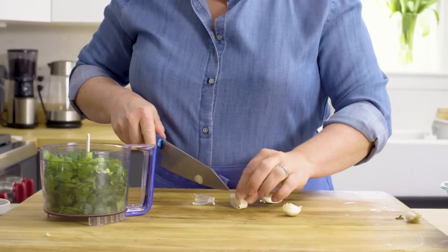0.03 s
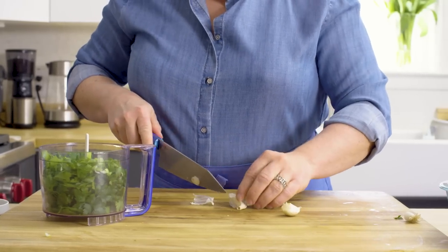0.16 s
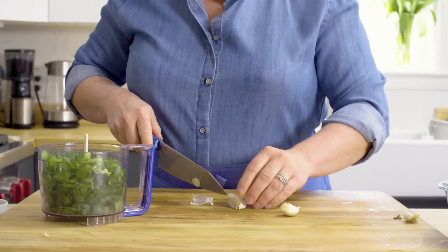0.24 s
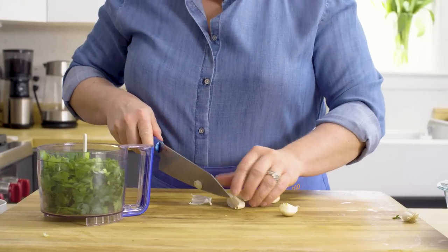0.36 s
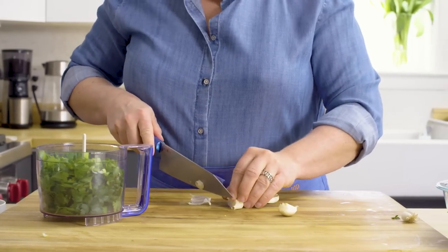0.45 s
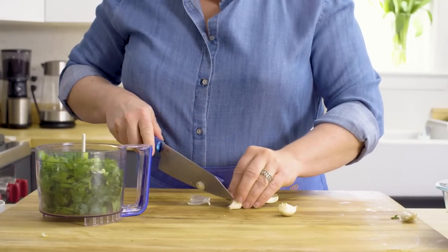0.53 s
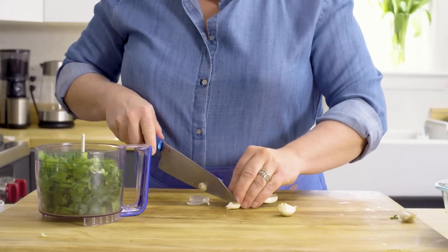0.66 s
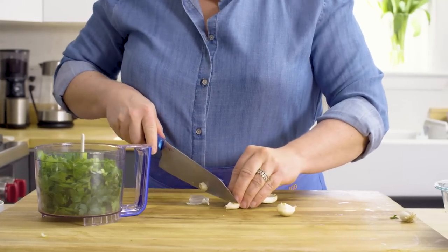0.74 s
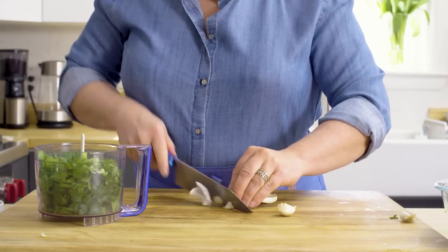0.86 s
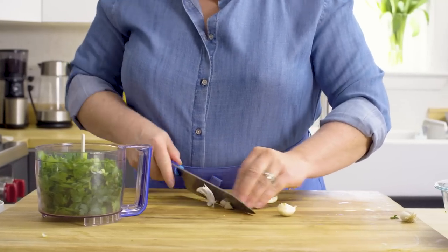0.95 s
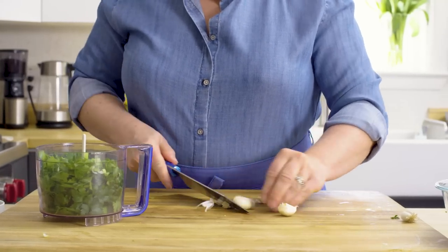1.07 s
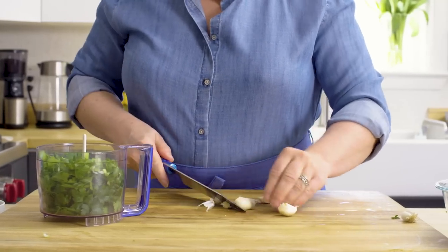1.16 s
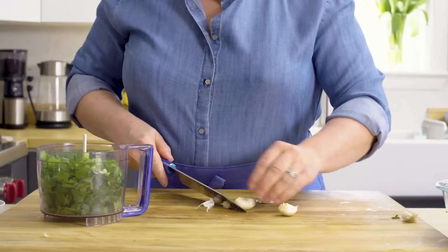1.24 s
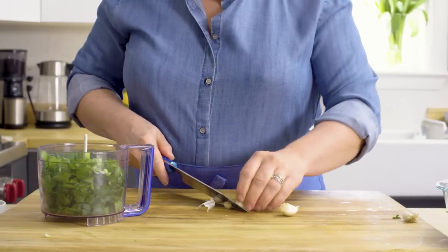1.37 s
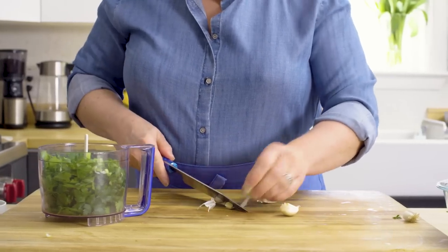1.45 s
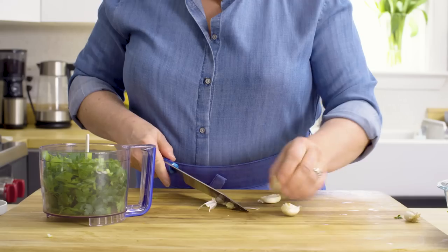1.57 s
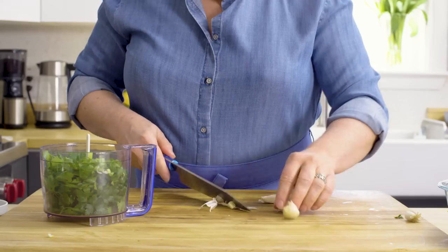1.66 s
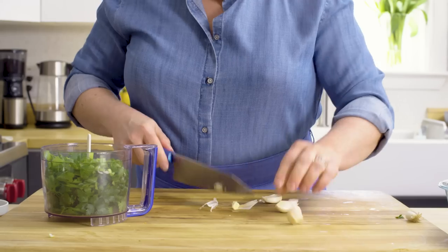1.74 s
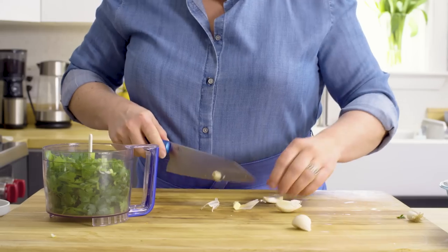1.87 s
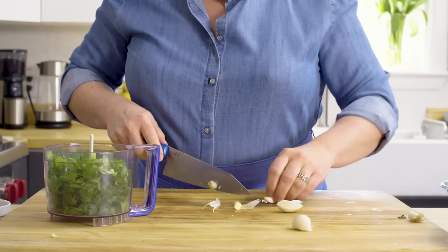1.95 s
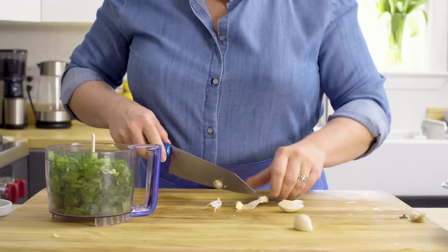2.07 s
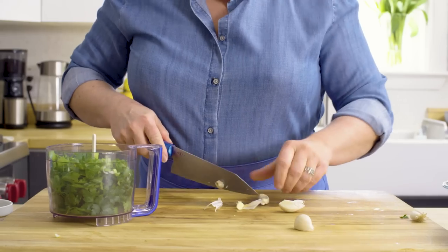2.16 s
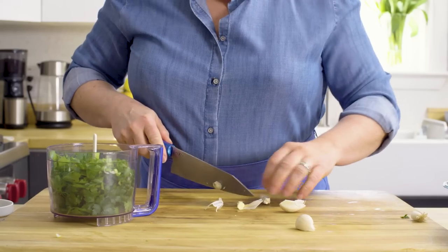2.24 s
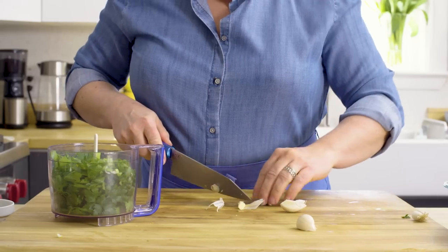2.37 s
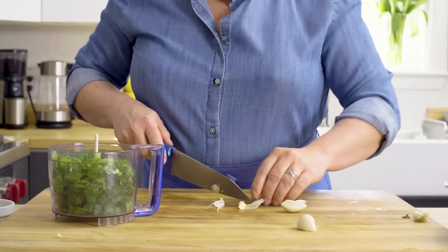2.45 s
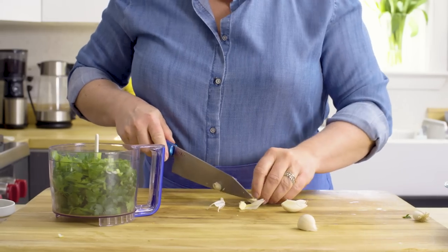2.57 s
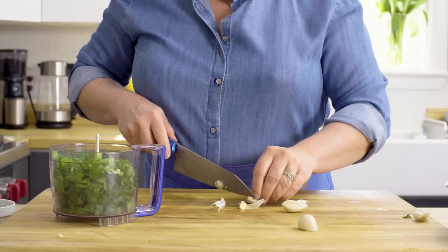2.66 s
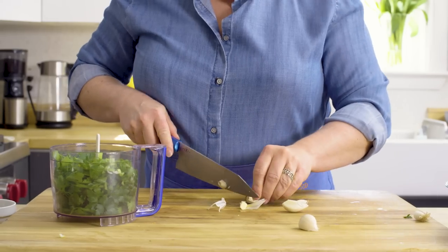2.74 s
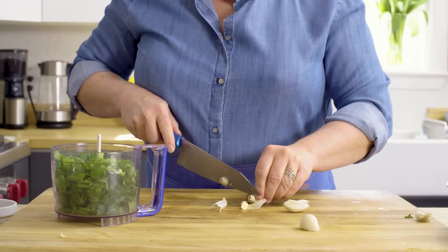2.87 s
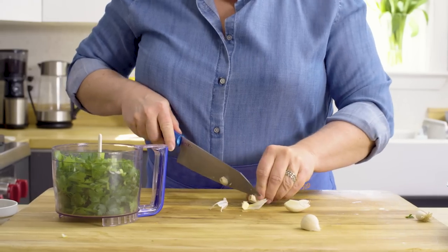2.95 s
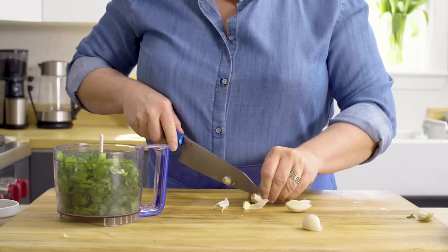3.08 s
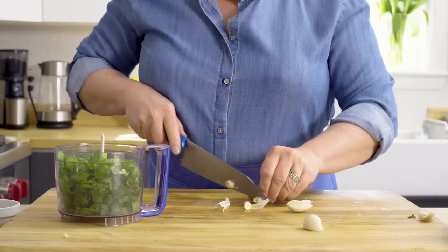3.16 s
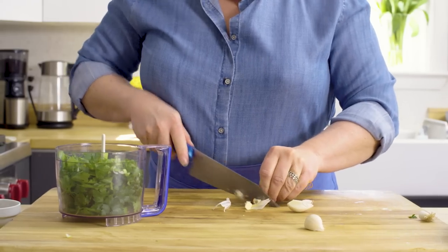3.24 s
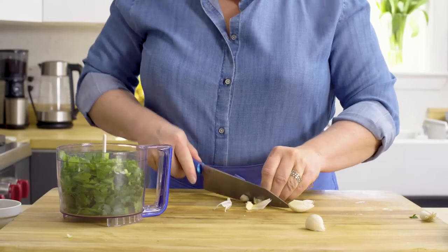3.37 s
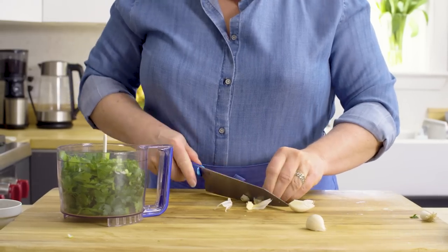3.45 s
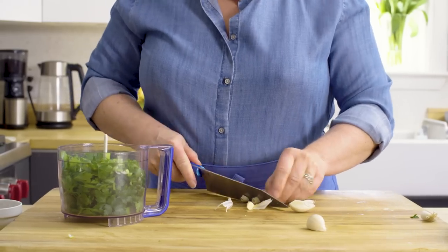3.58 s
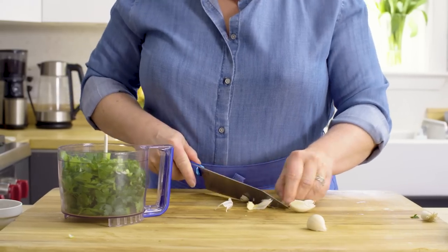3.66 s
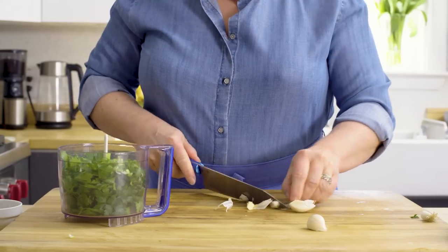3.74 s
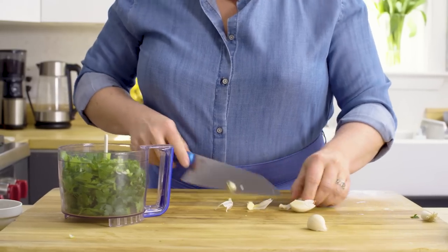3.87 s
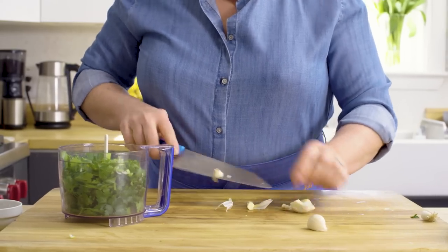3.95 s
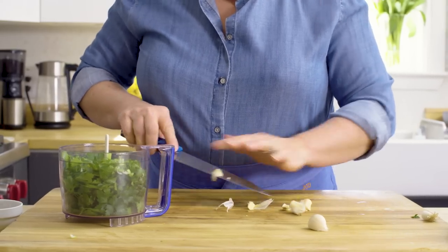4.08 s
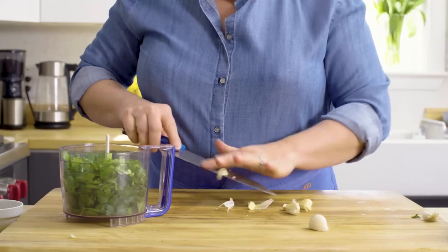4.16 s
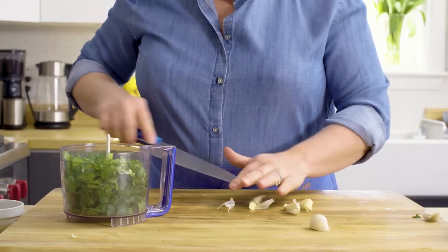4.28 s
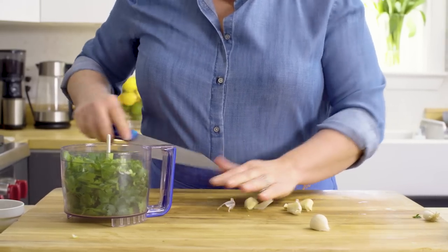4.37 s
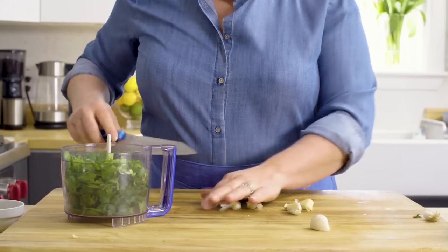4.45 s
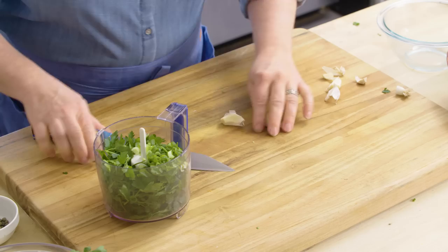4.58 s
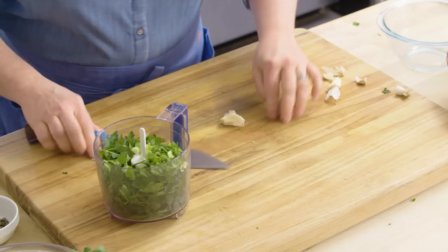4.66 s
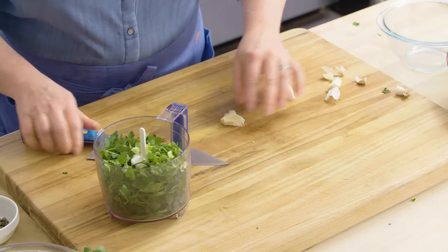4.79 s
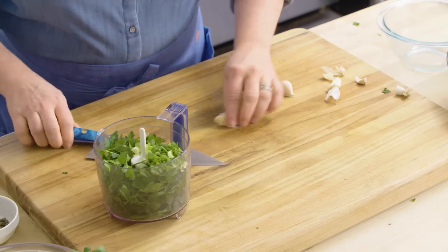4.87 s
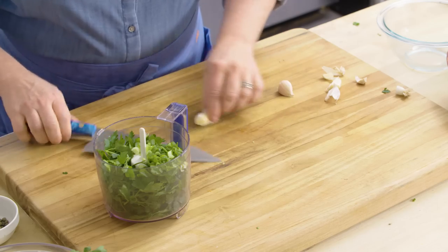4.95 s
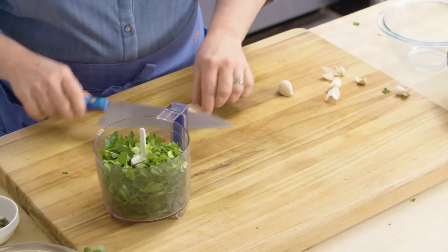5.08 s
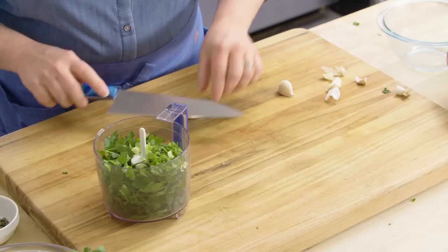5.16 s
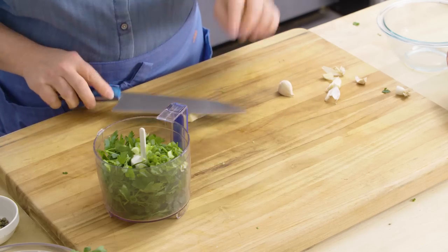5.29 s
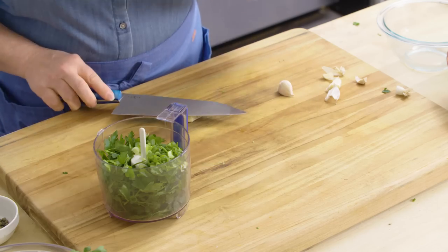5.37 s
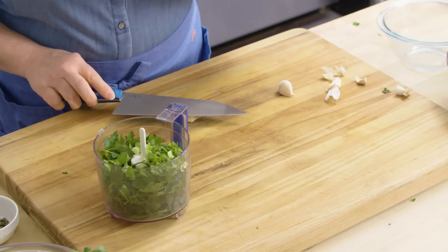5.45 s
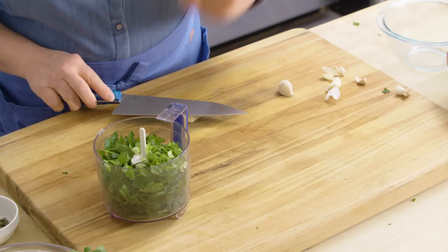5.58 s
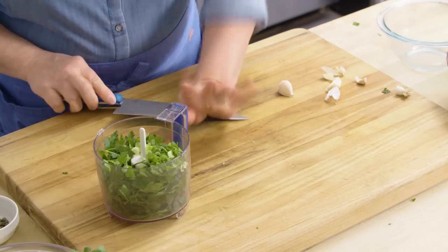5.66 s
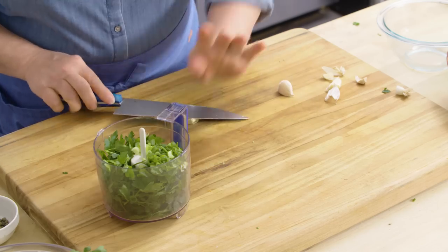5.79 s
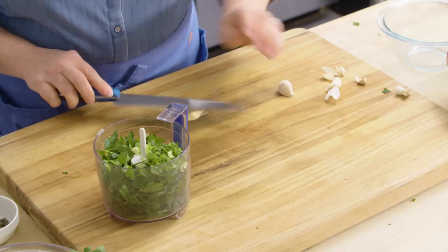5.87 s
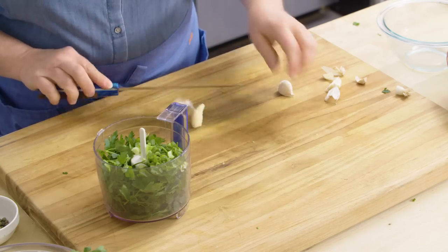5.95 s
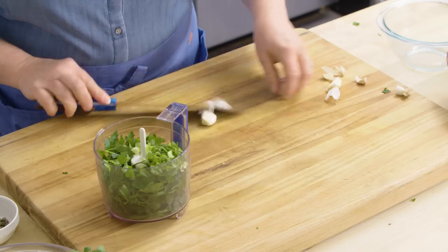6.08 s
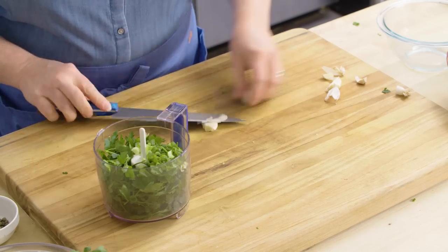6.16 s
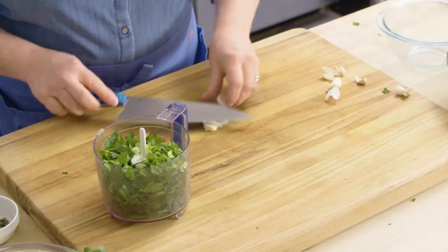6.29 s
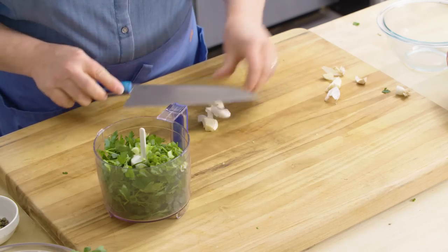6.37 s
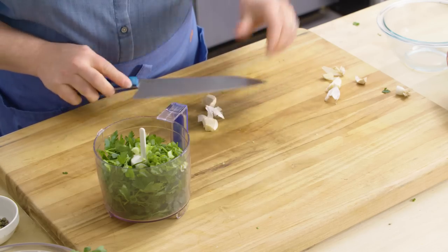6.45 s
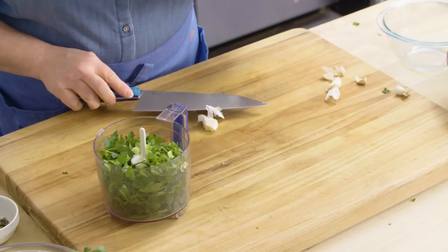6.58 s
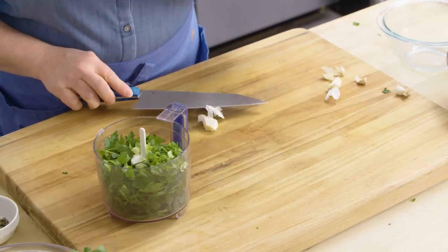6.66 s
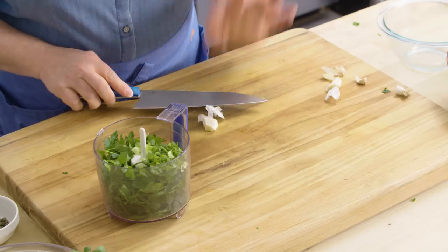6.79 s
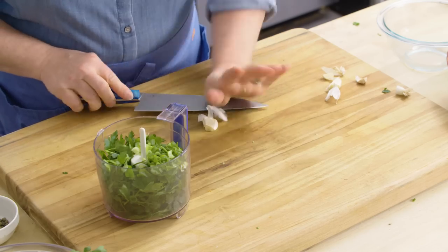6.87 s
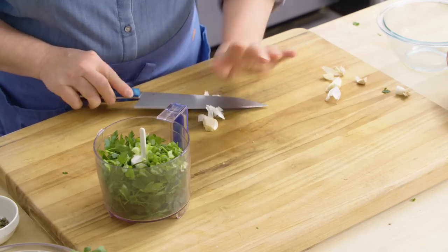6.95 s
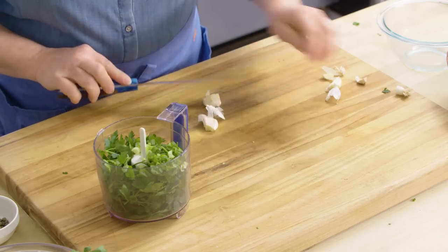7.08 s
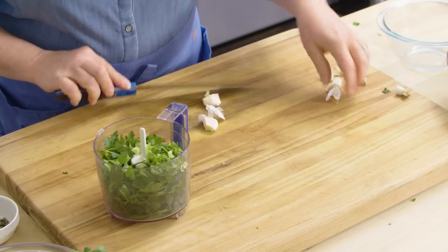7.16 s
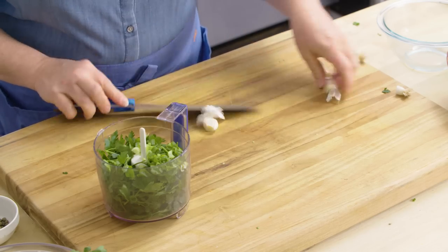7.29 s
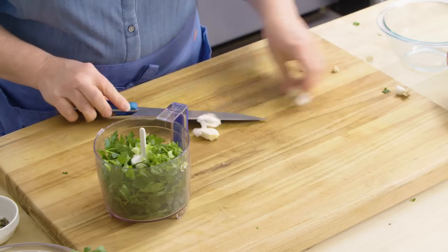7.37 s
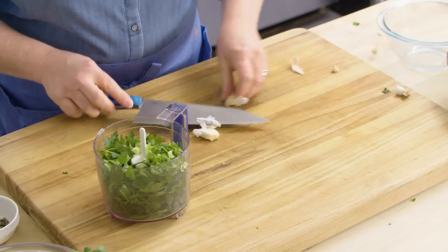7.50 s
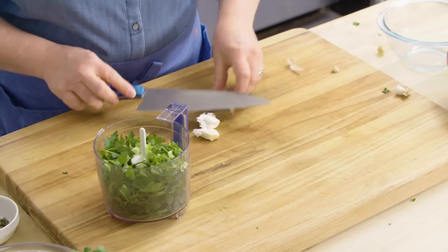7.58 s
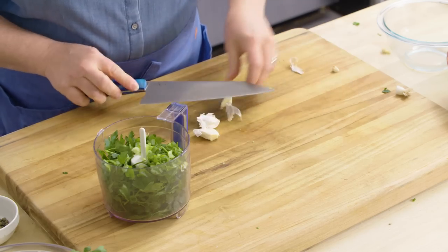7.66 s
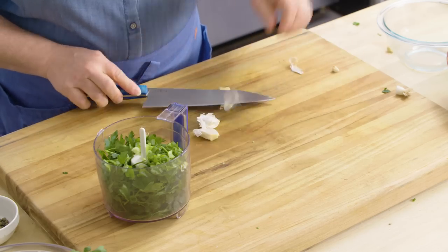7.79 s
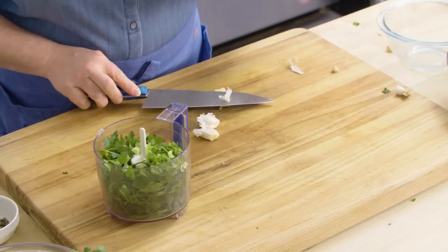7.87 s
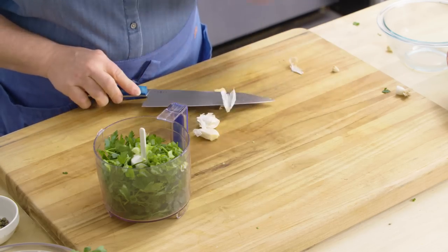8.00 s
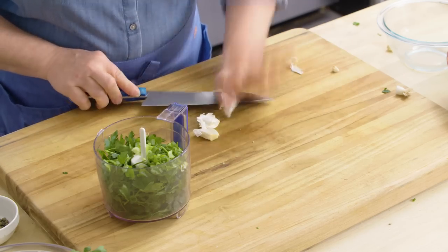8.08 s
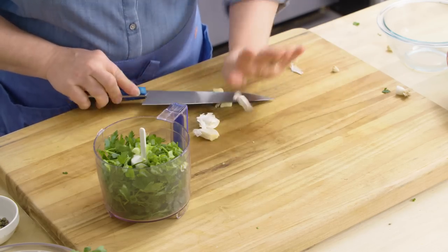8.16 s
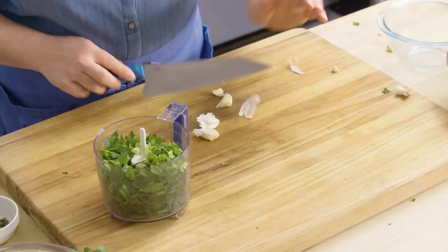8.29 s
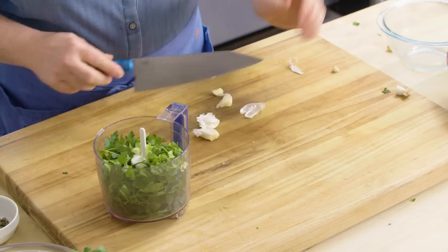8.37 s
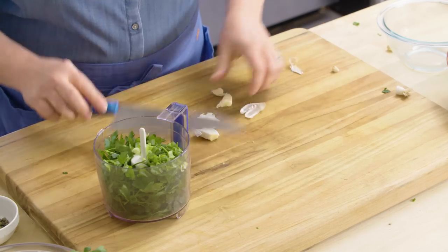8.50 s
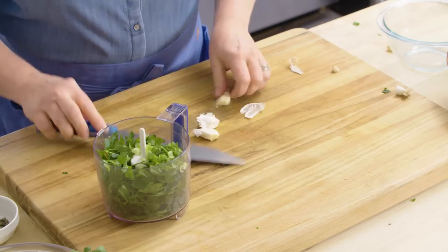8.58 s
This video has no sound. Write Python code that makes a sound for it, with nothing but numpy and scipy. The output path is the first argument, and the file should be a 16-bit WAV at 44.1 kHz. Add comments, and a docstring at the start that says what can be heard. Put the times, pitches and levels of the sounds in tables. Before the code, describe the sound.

Close to a wooden cutting board in a small kitchen, a knife trims garlic: dry skins crackle and snap, a few firm woody knocks with short drags, and faint taps between. Later four palm blows on the flat blade crush cloves with a crunchy burst and low counter thud. Short room echo, very faint low ventilation.

```python
"""A small kitchen, at the wooden board: one microphone, heard close, with no loss over distance.
From the start papery skins crackle (filtered grains) and snap (short noise clicks) as a knife trims garlic;
its strokes knock and slide on the board (damped modes of wood and steel), light taps and drags between them.
From 5.7 s a palm smashes cloves under the flat blade: four blows burst flesh and shake the counter's modes.
The last blow comes just before the end; throughout, noise tails echo the work over a low ventilation rumble."""
import sys
import numpy as np
from scipy import signal
from scipy.fft import rfft, irfft, next_fast_len
from scipy.io import wavfile
from scipy.ndimage import uniform_filter1d, minimum_filter1d

SR = 44100
rng = np.random.default_rng(int(sys.argv[2]) if len(sys.argv) > 2 else 0)


def unload_audio(sound):
    """Save the sound as a 16-bit wav file, at the path given as the first command line argument."""
    columns = np.transpose(np.atleast_2d(sound))
    # keep every value between -1 and 1, then stretch to whole-number steps
    steps = np.round(np.clip(columns, -1, 1) * 32767)
    wavfile.write(sys.argv[1], SR, steps.astype(np.int16))


N = 380583
T = np.arange(SR * 3 // 8) / SR  # time within one event, s


def amp(db):
    """Decibels to gain."""
    return 10 ** (np.asarray(db) / 20)


def unit(x):
    """Scale to rms 1."""
    return x / np.sqrt(np.mean(x ** 2) + 1e-20)


def burst(x, size=88):
    """Scale so that the loudest stretch of size samples has rms 1."""
    return x / np.sqrt(uniform_filter1d(x ** 2, size=size).max() + 1e-20)


def along(points, hz):
    """Read (Hz, value) points on a log frequency axis."""
    f, v = np.transpose(points)
    return np.interp(np.log(hz + 1), np.log(f), v)


def filtered(x, response):
    """Multiply the spectrum of x by a response of frequency."""
    size = next_fast_len(len(x) + 8192)
    spectrum = rfft(x, size) * response(np.fft.rfftfreq(size, 1 / SR))
    return irfft(spectrum, size)[:len(x)]


def coloured(x, spectrum):
    """Filter x by a spectrum table, at rms 1."""
    return unit(filtered(x, lambda hz: amp(along(spectrum, hz))))


def add(track, s, x):
    """Mix x into the track from time s on."""
    start = max(round(s * SR), 0)
    track[start:start + len(x)] += x[:max(len(track) - start, 0)]


def grains(per_s, spread_db):
    """Tiny impulses of uneven size and either sign at random times."""
    chance = rng.random(len(T))
    size = rng.standard_normal(len(T))
    sign = rng.choice([-1, 1], len(T))
    return (chance < per_s / SR) * sign * amp(spread_db * np.clip(size, -2, 2))


def ring(modes, scatter_db, attack_s, spot_hz=1000, favour_db=0, bright_db=0):
    """Damped modes at fresh strengths; those near spot_hz are favoured, and low ones build up slowest."""
    hz, db, t60 = np.transpose(modes)[:, :, None]
    db = db + scatter_db * rng.standard_normal(hz.shape)
    db = db + favour_db * np.exp(-(np.log(hz / spot_hz) / 0.14) ** 2)
    db = db + bright_db * np.maximum(np.log2(hz / 1200), 0)  # dB per octave on the upper modes
    onset = 1 - np.exp(-(T / attack_s) ** 2 * hz / np.median(hz))
    wave = np.sin(2 * np.pi * (hz * T + rng.random(hz.shape)))
    return np.sum(amp(db - 60 * T / t60) * onset * wave, axis=0)


def puff(spectrum, t60):
    """A quickly dying burst of coloured noise."""
    noise = coloured(rng.standard_normal(len(T)), spectrum)
    return burst(noise * amp(-60 * T / t60) * (1 - np.exp(-T / 0.0043)))


# The blade lands hard and is drawn on through the skins. Edge level is before the trim in knock():
# t/s, level/dB, favoured f/Hz at the spot struck, edge click level/dB re blow, heel level/dB re blow,
# counter level/dB, slide length/s, slide level/dB, steel level/dB re slide, skins level/dB
KNIFE_STROKES = [(0.91, -10, 1128, -23.5, -10, -66, .11, -42, -16.5, -43),
                 (3.331, -8, 828.7, -14, 0, -46, 0.089, -50, -7.5, -52),
                 (4.724, -14, 595, -28, -15, -71, 0.054, -39, -43, -79.5),
                 (6.081, -13, 614, -29.5, -12, -62.5, 0.089, -35.5, -15, -42),
                 (7.225, -11.5, 663, -22.5, -9.5, -48, 0.13, -33.5, -9, -45)]
HEEL_DELAY_S, SLIDE_DELAY_S = .007, .015  # after the tip lands


def strokes(ping_db=4):
    """Tip and heel knock, the blade sings and slides; pushed skins rustle most at the end of the slide."""
    out = np.zeros(N)
    for (s, db, spot_hz, edge_db, heel_db, counter_db,
         slide_s, slide_db, steel_db, skins_db) in KNIFE_STROKES:
        tip = knock(spot_hz, thud_db=-21.5, edge_db=edge_db, favour_db=4.5)
        heel = knock(spot_hz=530, thud_db=-23, edge_db=-17.5, favour_db=7.5)
        drawn = slide(slide_s - SLIDE_DELAY_S, steel_db, spot_hz=1350, favour_db=6.5)
        rustle = crunch(rise_s=slide_s / 2, fall_s=0.091, low_hz=5300)
        add(out, s, amp(db) * tip + amp(counter_db) * thump(spot_hz=38))
        add(out, s + HEEL_DELAY_S, amp(db + heel_db) * heel)
        add(out, s, amp(slide_db + steel_db + ping_db) * ping(free_s=slide_s))
        add(out, s + SLIDE_DELAY_S, amp(slide_db) * drawn)
        add(out, s, amp(skins_db) * rustle)
    return out


# A palm smashes a clove under the flat blade. Edge and follow-through levels are before trims:
# t/s, level/dB, favoured f/Hz at the spot struck, edge click level/dB re blow, flesh level/dB,
# husk level/dB, counter level/dB, follow-through level/dB
PALM_SMASHES = [(5.708, -11, 625, -10.5, -19, -21, -27.5, -38),
                (6.882, -11, 1260, -13, -23.5, -31, -21.5, -15),
                (8.137, -15.5, 1110, -4.5, -19, -28.5, -21, -16),
                (8.616, -12, 1300, -10.5, -21.5, -36, -31.5, -25)]
COLLAPSE_S = .038  # the clove gives way and the blade meets the board
LOW_PART_DELAY_S = .007  # then the low woody part of the slap, near 330 Hz, and the grind


def smashes(ping_db=-37, jolt_db=-36, slap_db=-3, low_part_db=-5, grind_db=-14):
    """Flesh and husk burst, the counter shakes; the blade follows through, slaps the board and grinds."""
    out = np.zeros(N)
    for s, db, spot_hz, edge_db, flesh_db, husk_db, counter_db, follow_db in PALM_SMASHES:
        blow = knock(spot_hz, thud_db=-13, edge_db=edge_db, favour_db=4.0)
        flesh = crunch(rise_s=0.0045, fall_s=0.014, low_hz=2830)
        husk = crunch(rise_s=0.0037, fall_s=.009, low_hz=8700)
        jolt = thump(spot_hz=137, spread_octaves=0.83)
        slap = knock(spot_hz=585, thud_db=2, edge_db=-14.5, favour_db=9.5)
        low_part = knock(spot_hz=330, thud_db=-7, edge_db=-14.5, favour_db=12.5)
        grind = slide(length_s=0.068, steel_db=-47.5, spot_hz=630, favour_db=5.5)
        low_part_s = s + COLLAPSE_S + LOW_PART_DELAY_S
        add(out, s, amp(db) * blow + amp(ping_db) * ping(free_s=.012))
        add(out, s - .007, amp(flesh_db) * flesh)
        add(out, s - .004, amp(husk_db) * husk)
        add(out, s + 0.0048, amp(counter_db) * thump(spot_hz=54.5) + amp(jolt_db) * jolt)
        add(out, s + COLLAPSE_S, amp(follow_db + slap_db) * slap)
        add(out, low_part_s, amp(follow_db + low_part_db) * low_part)
        add(out, low_part_s, amp(follow_db + grind_db) * grind)
    return out


# Modes of the wooden board, before scatter and damping: f/Hz, relative level/dB, t60/s
BOARD_MODES = [(258, -14.5, 0.18), (311, -12.5, 0.1), (450, -13.5, 0.0087), (534, -1.5, 0.043),
               (640, -1, 0.037), (721, 0, 0.024), (874, -3.5, 0.049), (1034, -11, .06),
               (1152.4, -2.5, 0.037), (1307.3, -1.5, 0.032), (1553, -9, 0.042), (1725.5, -9.5, 0.072),
               (1877, -19, 0.17), (2277, -22.5, 0.27)]
# Modes of the steel blade, before scatter and damping: f/Hz, relative level/dB, t60/s
BLADE_MODES = [(2870, -5, .12), (3159, 0, .22), (3342, -5, .1), (3650, -10, .06), (4060, -17, .12),
               (6510, -17, .08), (9300, -29, .12), (10350, -24, .12)]
# Spectrum of the dull thud: f/Hz, relative level/dB
THUD_SPECTRUM = [(60, -31.5), (140, -14.5), (230, 1), (320, 4.5), (420, -12), (900, -42), (3000, -90)]
# Spectrum of the edge on wood: f/Hz, relative level/dB
EDGE_SPECTRUM = [(900, -29), (1800, -1), (3200, 0.5), (4300, -8), (6500, -9.5), (10000, -24), (16000, -26)]


def knock(spot_hz, thud_db, edge_db, favour_db, wood_db=-5, body_db=-6, click_db=-3,
          press_s=0.013, damped_db=-13, hardness=0.67):
    """The board rings and is soon damped by what presses on it; a thud and a steel click go with it."""
    damping = amp(damped_db * (1 - np.exp(-(T / press_s) ** 4)))
    bright = hardness * (edge_db + 14.5)  # a harder contact reaches higher modes
    wood = ring(BOARD_MODES, scatter_db=2.5, attack_s=0.0011, spot_hz=spot_hz,
                favour_db=favour_db, bright_db=bright)
    wood = burst(wood * damping, size=400)
    steel = burst(ring(BLADE_MODES, scatter_db=3, attack_s=.0005) * damping)
    click = puff(EDGE_SPECTRUM, t60=0.017) + amp(-20) * steel
    thud = puff(THUD_SPECTRUM, t60=0.033)
    return amp(wood_db) * wood + amp(thud_db + body_db) * thud + amp(edge_db + click_db) * click


def slide(length_s, steel_db, spot_hz, favour_db, fade_s=0.0033):
    """Steel catches on the wood grain; the little slips excite both board and blade."""
    slips = grains(per_s=1700, spread_db=7.5)
    board = ring(BOARD_MODES, scatter_db=2.5, attack_s=0.00033, spot_hz=spot_hz, favour_db=favour_db)
    blade = ring(BLADE_MODES, scatter_db=1.5, attack_s=.001)
    wood = unit(signal.fftconvolve(slips, board)[:len(T)])
    steel = unit(signal.fftconvolve(slips, blade)[:len(T)])
    scrape = coloured(slips, EDGE_SPECTRUM)
    stroke = (1 - np.exp(-T / 0.0037)) * np.exp(-np.maximum(T - length_s, 0) / fade_s) * amp(-35 * T)
    return stroke * (wood + amp(steel_db) * steel + amp(-15) * scrape)


def ping(free_s):
    """Held only by its handle, the blade rings on for a moment."""
    return burst(ring(BLADE_MODES, scatter_db=5.0, attack_s=.0005) * np.exp(-(T / free_s) ** 2), size=400)


# Modes of the counter, before the spot struck weights them: f/Hz, relative level/dB, t60/s
COUNTER_MODES = [(36, 2.5, 0.12), (49, -5, .26), (80, -5, 0.23), (123.55, -1, .15), (143.3, 0, 0.18),
                 (199, -5, 0.12)]


def thump(spot_hz, spread_octaves=0.35):
    """The counter bounces under a blow, most near the pitch of the spot struck."""
    modes = []
    for hz, level, t60 in COUNTER_MODES:
        off_spot = np.log2(hz / spot_hz) / spread_octaves
        modes.append((hz, level - 20 * np.log10(1 + off_spot ** 2), t60))
    return burst(ring(modes, scatter_db=0.0, attack_s=0.0063), size=900)


# Light touches of blade or hand. Thud and edge levels are before the trims in knock():
# t/s, level/dB, favoured f/Hz at the spot struck, thud level/dB re touch,
# edge click level/dB re touch, counter level/dB
LIGHT_TAPS = [(1.12, -39.5, 530, -28, -25, -83), (1.735, -29.5, 1122, -18, -30, -70),
              (1.75, -33, 508, -18, -32.5, -65), (1.889, -45.5, 647, -25, -28, -71),
              (3.586, -48, 1060, -27, 4, -84), (3.673, -43, 852, -23, -5.5, -83),
              (4.381, -43, 624, -28, -14, -83.5), (4.638, -45, 440, 9.5, -43, -58),
              (4.761, -22.5, 1105, -5, -13, -40.5), (4.909, -34.5, 490, -34, -13.5, -69.5),
              (4.992, -58.5, 536, -14, 0.5, -79.5), (5.348, -25, 1133, -19, -35, -38),
              (5.374, -26, 1135, -28, -40, -42.5), (6.579, -29.5, 749, -27, -30.5, -67),
              (7.511, -54.5, 640, -20.5, -3.5, -80.5), (7.824, -28, 1267, -18, -14.5, -45)]


def taps(ping_db=-6):
    """A light touch rings mostly near one board pitch, steel in step with its click; the counter answers."""
    out = np.zeros(N)
    for s, db, spot_hz, thud_db, edge_db, counter_db in LIGHT_TAPS:
        touch = knock(spot_hz, thud_db, edge_db, favour_db=10)
        touch = touch + amp(edge_db + ping_db) * ping(free_s=0.00726)
        add(out, s, amp(db) * touch + amp(counter_db) * thump(spot_hz=168, spread_octaves=1.1))
    return out


# The edge drags and judders on the wood:
# start t/s, length/s, level/dB, favoured f/Hz at the spot rubbed, favour level/dB
EDGE_DRAGS = [(1.12, 0.041, -52, 1700, 6), (3.403, 0.034, -33.5, 527, 24), (3.439, .067, -50, 526, 14),
              (4.691, 0.045, -47, 1200, 1), (4.751, 0.032, -40.5, 1100, -0.5), (4.89, 0.064, -47, 1500, 4)]


def drags():
    """The edge is pulled over the board without a blow, in a run of small slips."""
    out = np.zeros(N)
    for s, length_s, db, spot_hz, favour_db in EDGE_DRAGS:
        add(out, s, amp(db) * slide(length_s, steel_db=-66, spot_hz=spot_hz, favour_db=favour_db))
    return out


# Skin and flesh crunches, and two small blade squeaks near 3.3 kHz (at 3.584 and 3.654 s):
# t/s at the height, level/dB, length/s, lowest resonance f/Hz
CRUNCHES_AND_SQUEAKS = [(0.08, -65.5, 0.065, 3480), (0.878, -33, 0.055, 5100), (0.909, -15.5, 0.0085, 6540),
                        (1.074, -34, .03, 3700), (1.082, -44, 0.14, 3430), (1.459, -50, 0.047, 3040),
                        (1.531, -31.5, 0.054, 6170), (1.539, -47.5, 0.056, 1720),
                        (1.578, -38.5, 0.018, 4700), (1.75, -52.5, 0.048, 9040), (2.494, -56.5, .06, 6530),
                        (2.951, -47.5, 0.018, 6800), (3.237, -49, 0.051, 7000), (3.283, -35, 0.055, 5900),
                        (3.313, -33, 0.03, 5500), (3.584, -44.5, 0.011, 3340), (3.654, -56.5, 0.059, 3300),
                        (3.707, -56.5, 0.14, 7490), (4.269, -64, 0.063, 2510), (4.594, -45.5, 0.07, 4370),
                        (4.619, -38.5, .02, 1400), (4.903, -64.5, 0.084, 3800), (5.026, -63, .14, 5960),
                        (7.442, -42.5, .13, 8200), (7.82, -50.5, 0.042, 3370)]
CRUNCH_RISE_SHARE = 0.24  # share of the length given to the rise constant; the fall takes the rest


def crunches():
    """Skin and flesh crunch and the blade squeaks twice, each a swelling cloud of resonant grains."""
    out = np.zeros(N)
    for s, db, length_s, low_hz in CRUNCHES_AND_SQUEAKS:
        rise_s = CRUNCH_RISE_SHARE * length_s
        add(out, s - 2 * rise_s, amp(db) * crunch(rise_s, length_s - rise_s, low_hz))
    return out


# Spectrum of the crackling skin: f/Hz, relative level/dB
SKIN_SPECTRUM = [(1000, 4.5), (3200, -1), (4500, -4), (7000, 0), (9000, -6.5), (12500, -5), (16000, -18.5)]


def crunch(rise_s, fall_s, low_hz, edge_width=0.48, shape=1.5, clump_db=3, clumps_per_s=170):
    """A cloud of tiny fractures, in uneven clumps, swells to its height after twice rise_s and dies."""
    height_s = 2 * rise_s
    swell = np.exp(-2 * np.maximum((height_s - T) / rise_s, (T - height_s) / fall_s) ** shape)
    unevenness = np.interp(T * clumps_per_s, np.arange(len(T)), rng.standard_normal(len(T)))
    crackle = coloured(amp(clump_db * unevenness) * grains(per_s=2200, spread_db=3), SKIN_SPECTRUM)

    def piece(hz):
        """A piece of skin resonates at its lowest pitch and radiates little below it."""
        radiation = hz / np.hypot(hz, .5 * low_hz)
        return radiation * hz ** 2 / np.hypot(low_hz ** 2 - hz ** 2, edge_width * low_hz * hz)

    return swell * unit(filtered(crackle, piece))


# The loudest flakes of skin break: t/s, level/dB before the common level_db, centre f/Hz
FLAKE_SNAPS = [(0.8757, -10.5, 7350), (0.9104, -6.5, 7460), (0.9931, -12.5, 7200), (1.009, -20.5, 11000),
               (1.0909, -15, 7700), (1.4584, -28, 10150), (1.497, -20.5, 7620), (1.5188, -28, 6920),
               (1.5342, -23, 6830), (1.5462, -15, 6880), (1.5755, -19.5, 5620), (1.5845, -26, 10400),
               (1.922, -31.5, 12100), (2.0213, -43, 6320), (2.496, -36, 7430), (2.815, -49.5, 7420),
               (2.9555, -22.5, 6200), (3.0595, -43, 10950), (3.2988, -15.5, 11900), (3.475, -26.5, 7330),
               (3.5343, -32.5, 11100), (3.5676, -22.5, 7080), (4.6029, -22, 8920), (4.616, -20, 5680),
               (5.9032, -35.5, 5110), (6.314, -31.5, 6950), (7.9006, -41, 6230)]


def snaps(level_db=-9, width_octaves=0.37, bass_cut_hz=3500):
    """Each dry flake breaks with a very short noise click around its own pitch."""
    out = np.zeros(N)
    click = amp(-60 * T / .008) * (1 - np.exp(-T / .0002))
    for s, db, pitch_hz in FLAKE_SNAPS:
        def colour(hz):
            """A peak around the flake's pitch, with the bass cut."""
            peak = 1 / (1 + (np.log2((hz + 1) / pitch_hz) / width_octaves) ** 2)
            return peak * hz ** 2 / (hz ** 2 + bass_cut_hz ** 2)

        snap = burst(filtered(rng.standard_normal(len(T)) * click, colour))
        add(out, s, amp(db + level_db) * snap)
    return out


# How long the kitchen's echo lasts: f/Hz, t60/s
ECHO_T60 = [(60, .25), (250, .3), (550, .36), (1500, .32), (5000, .28), (9000, .24), (16000, .2)]
# How strong the kitchen's echo is: f/Hz, level/dB
ECHO_LEVEL = [(60, -16.5), (250, -8.5), (550, -10), (1200, -16), (3000, -6), (7000, -10.5), (16000, -10)]


def kitchen(x, piece_count=16):
    """Diffuse echoes, with fresh noise in each of 16 equal stretches; each frequency dies at its own speed."""
    out = np.zeros(N)
    for piece in np.array_split(np.arange(N), piece_count):
        hz, t, z = signal.stft(rng.standard_normal(len(T)), SR, nperseg=256)
        decay = amp(-60 * t / along(ECHO_T60, hz)[:, None]) * (1 - np.exp(-(t / .008) ** 2))
        energy = np.mean(decay ** 2, axis=1, keepdims=True) * len(T)
        decay *= amp(along(ECHO_LEVEL, hz))[:, None] / np.sqrt(energy)
        tail = signal.istft(z * decay, SR, nperseg=256)[1]
        add(out, piece[0] / SR, signal.fftconvolve(x[piece], tail))
    return out


# Spectrum of the ventilation: f/Hz, relative level/dB
VENT_SPECTRUM = [(12, -40), (22, -18), (45, -4), (80, -11), (150, -13), (300, -15.5), (500, -19),
                 (900, -21.5), (1500, -31), (2400, -41), (6000, -46), (16000, -58)]


def ventilation(level_db=-66):
    """A steady, dull rush of air: coloured noise."""
    return amp(level_db) * coloured(rng.standard_normal(N), VENT_SPECTRUM)


def scene(skin_echo_db=-4):
    """Board work, its echo and the room's air; the small skins stir the room less than the board does."""
    board = strokes() + smashes() + taps() + drags()
    skins = crunches() + snaps()
    echo = kitchen(board + amp(skin_echo_db) * skins)
    return (board + skins + echo + ventilation())[None]


TOP_HZ = 16000  # middle of the recorder's upper band edge


def record(dry):
    """A fast limiter holds the loudest blows; the recorder keeps nothing above its band limit."""
    ceiling = .5
    needed = ceiling / np.maximum(np.abs(dry[0]), ceiling)
    gain = uniform_filter1d(minimum_filter1d(needed, size=89), size=89)  # about 2 ms, centred
    return filtered(dry[0] * gain, lambda hz: np.clip((TOP_HZ - hz) / 300 + .5, 0, 1))[None]


dry = scene()
out = record(dry)
unload_audio(out)
```